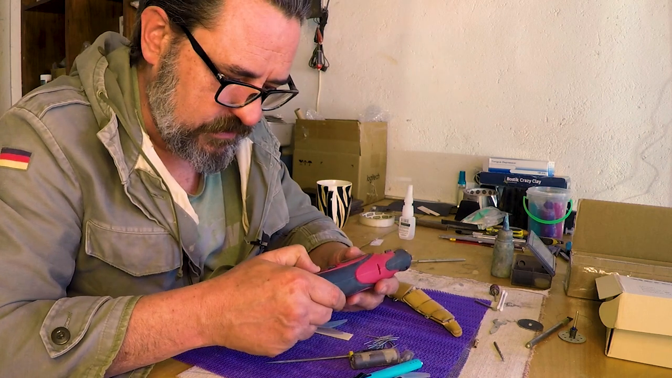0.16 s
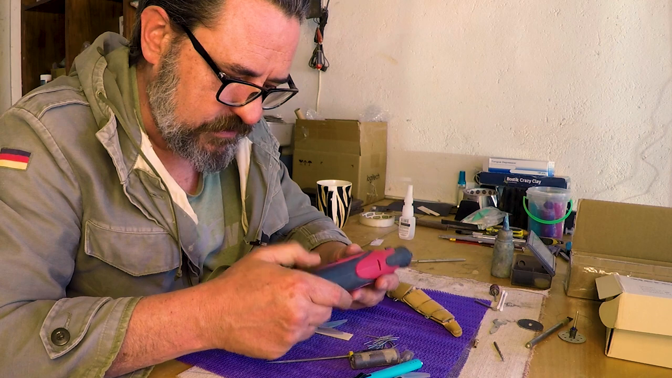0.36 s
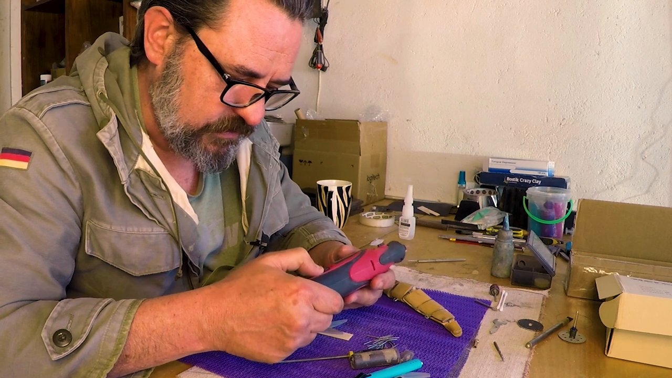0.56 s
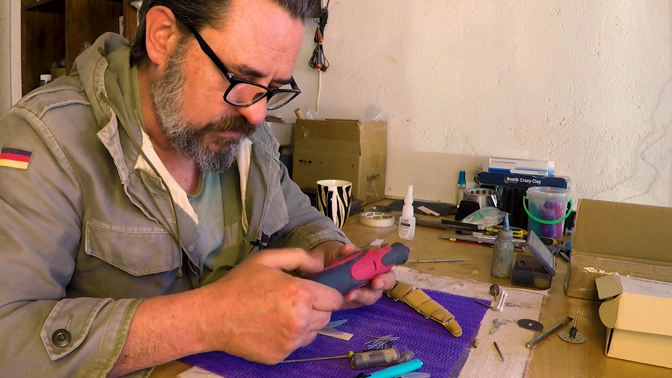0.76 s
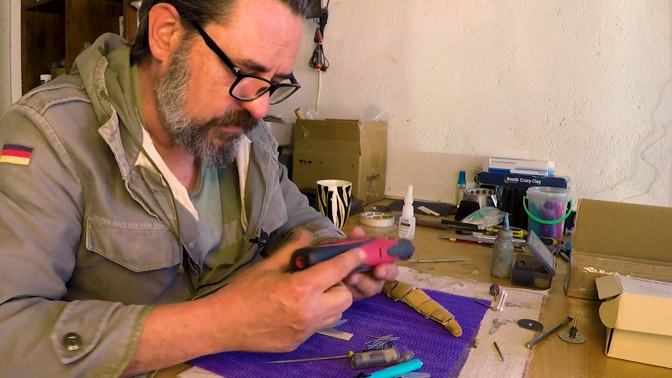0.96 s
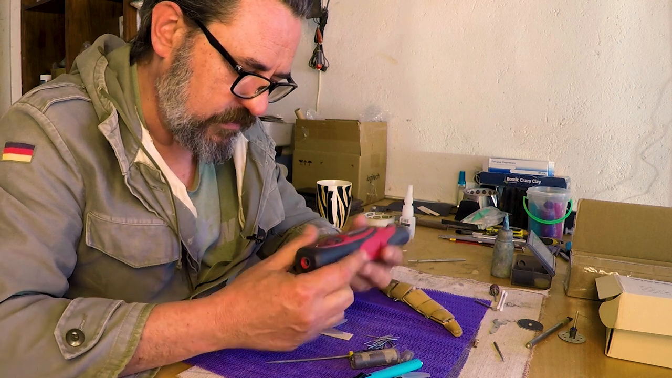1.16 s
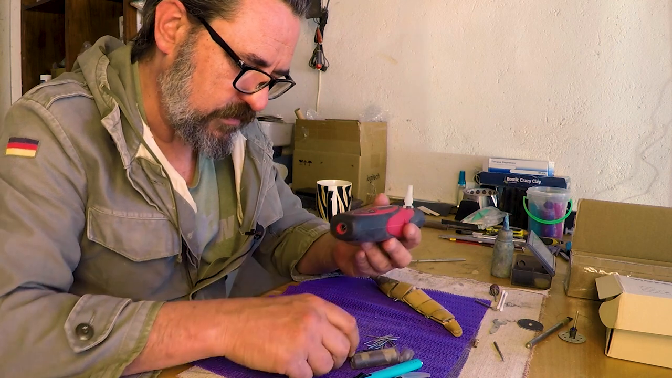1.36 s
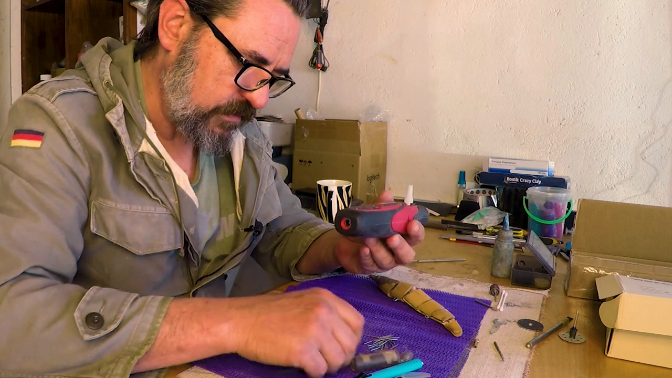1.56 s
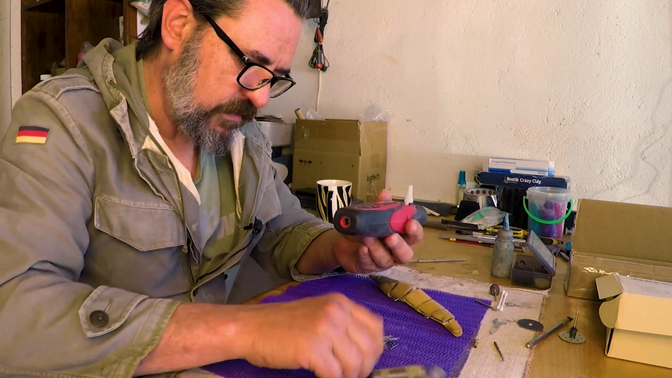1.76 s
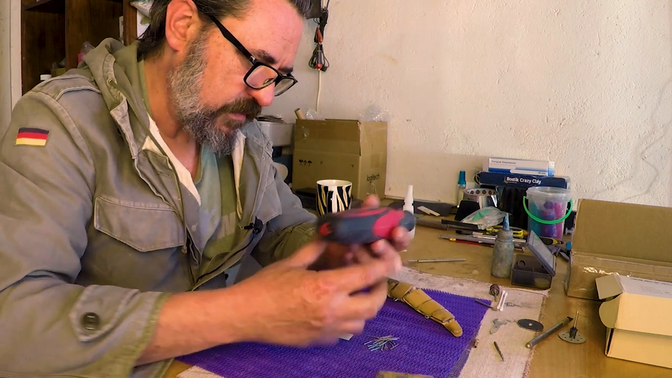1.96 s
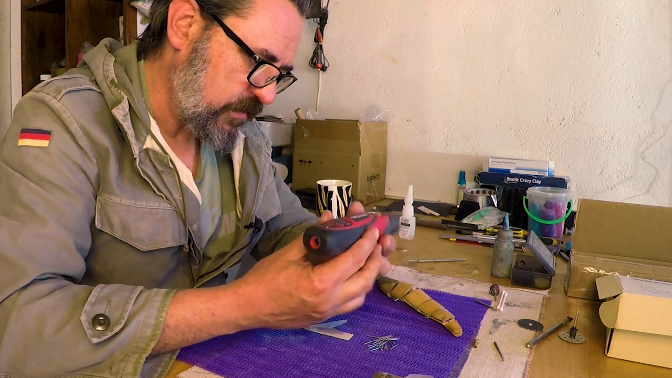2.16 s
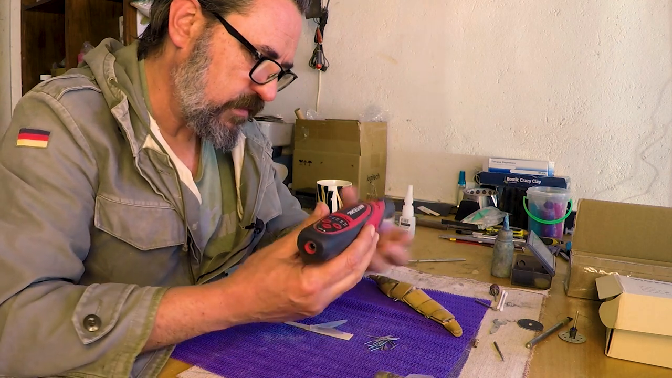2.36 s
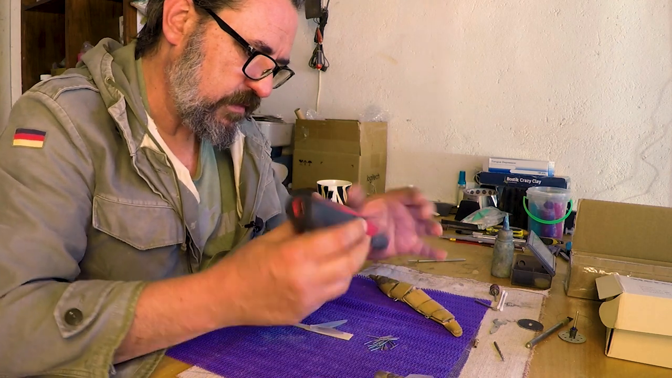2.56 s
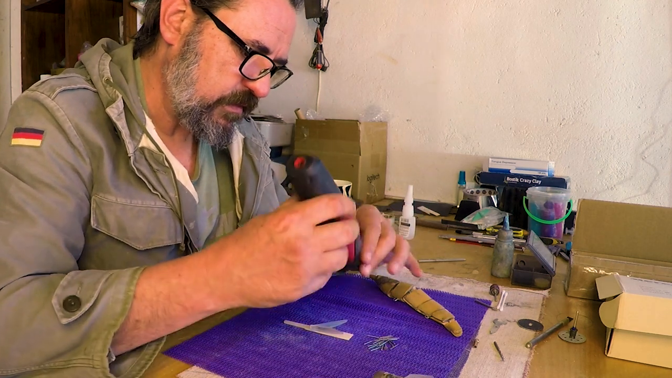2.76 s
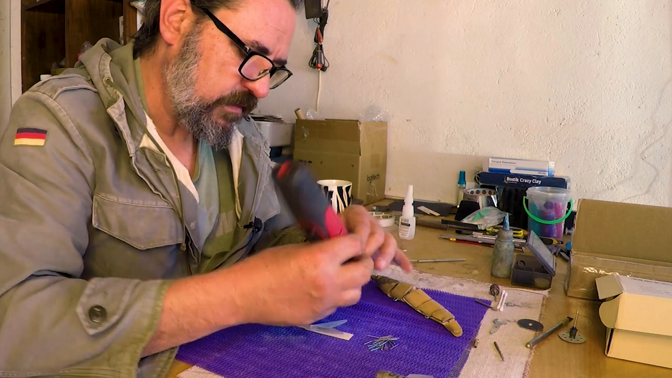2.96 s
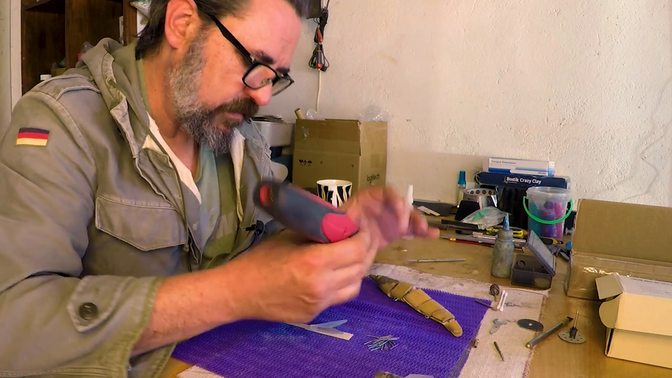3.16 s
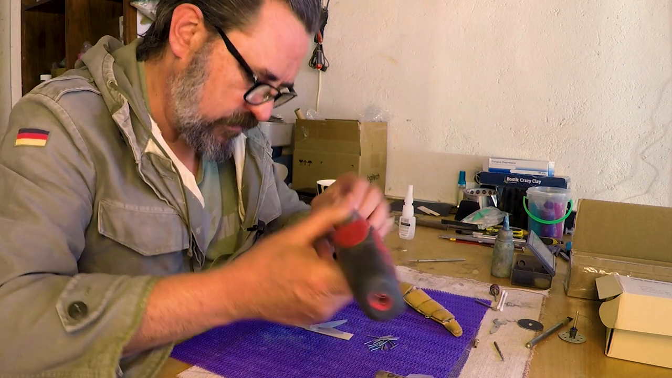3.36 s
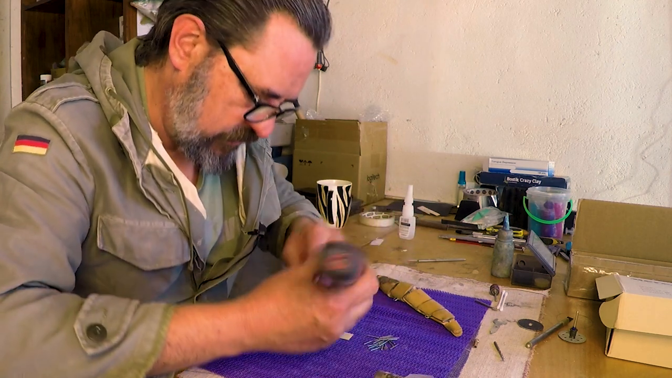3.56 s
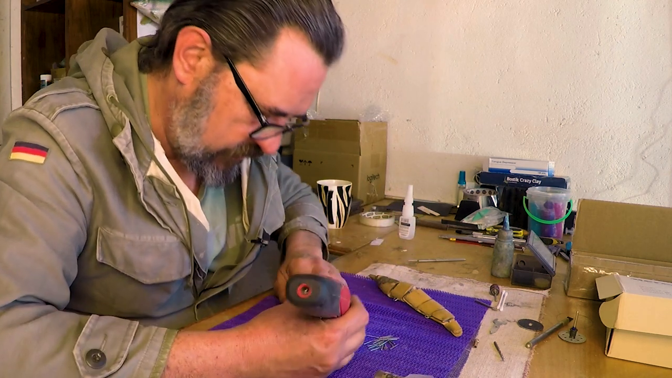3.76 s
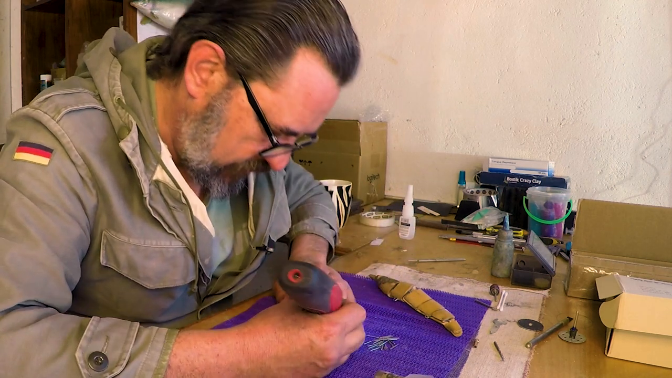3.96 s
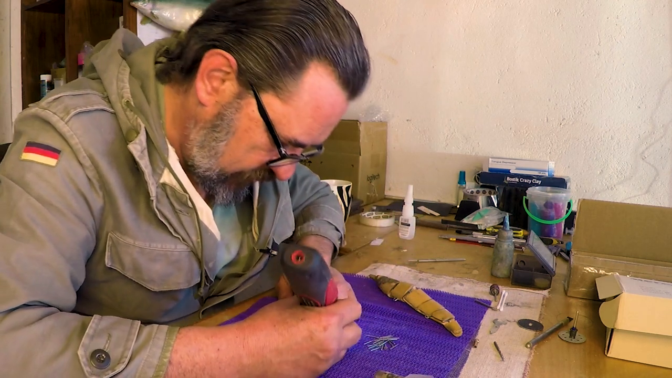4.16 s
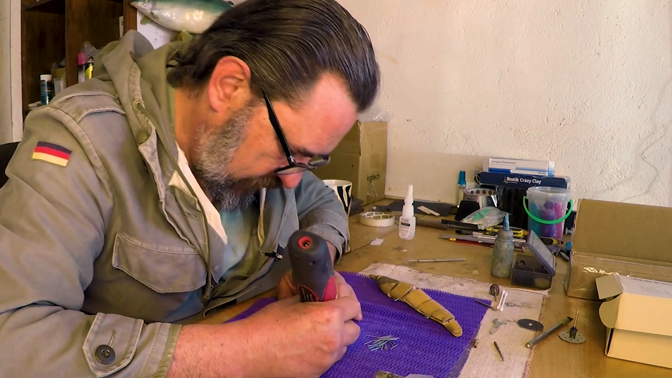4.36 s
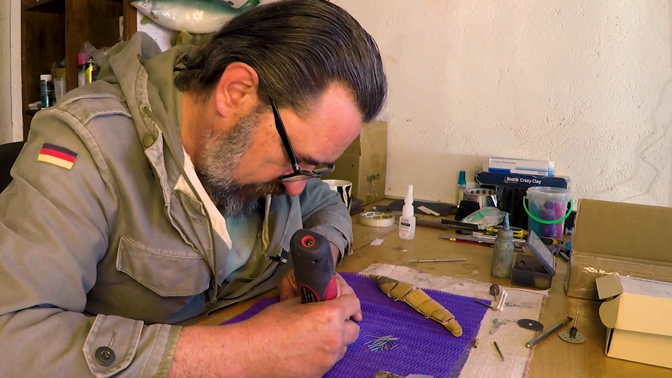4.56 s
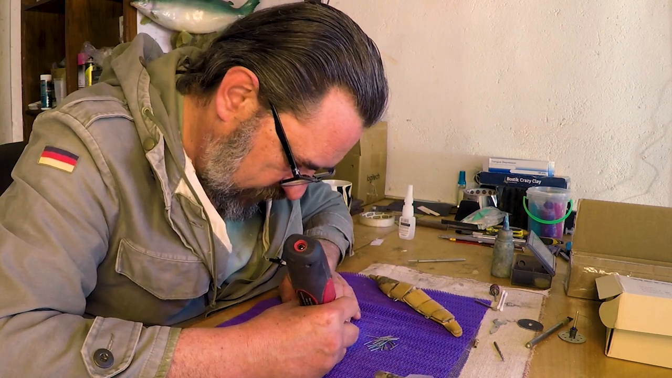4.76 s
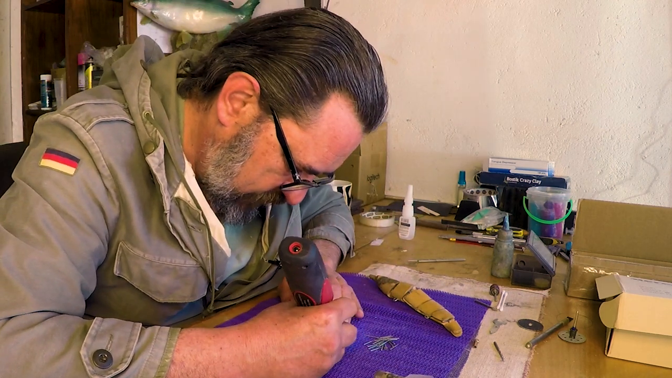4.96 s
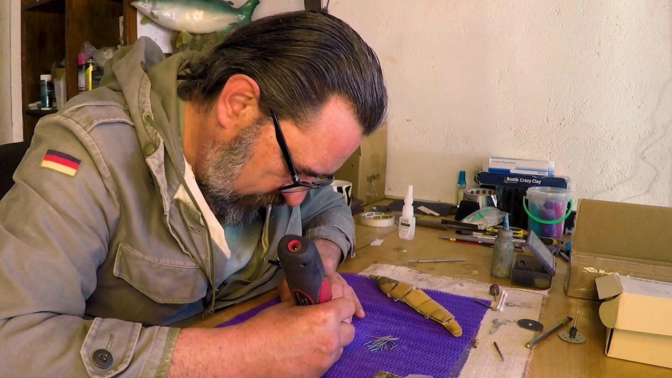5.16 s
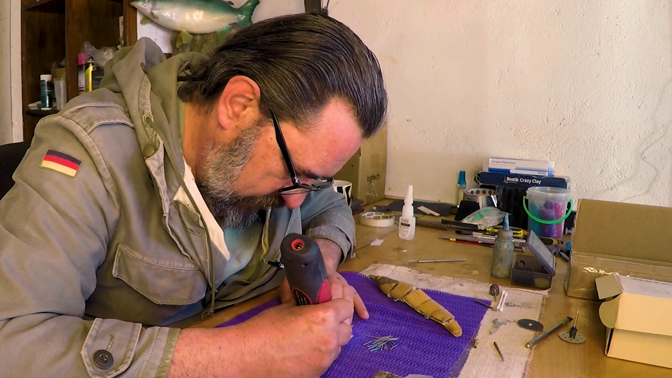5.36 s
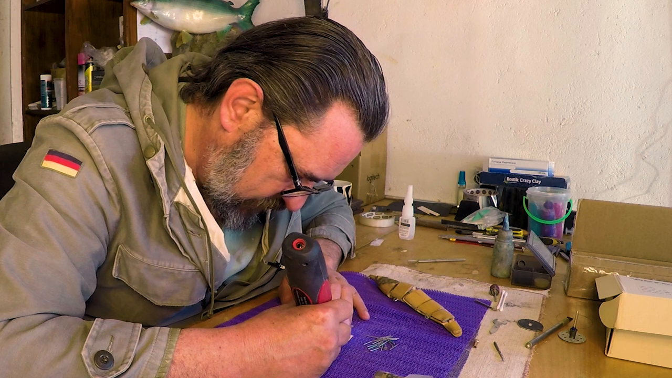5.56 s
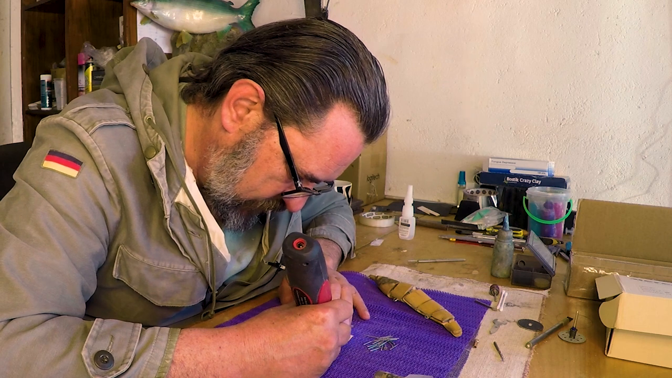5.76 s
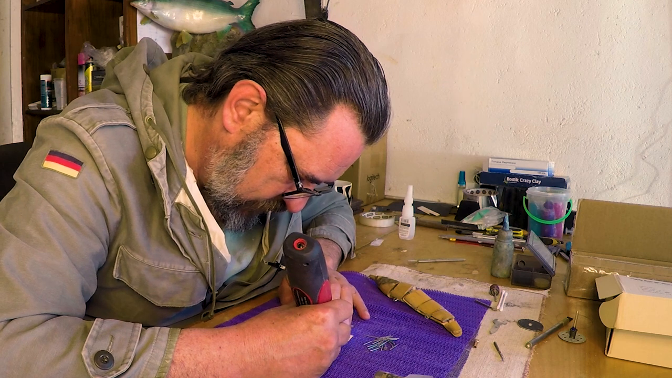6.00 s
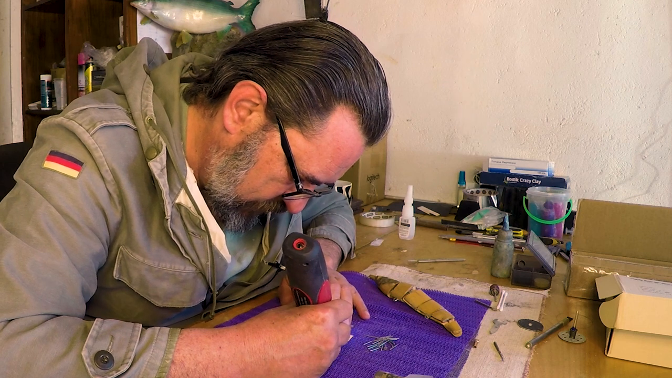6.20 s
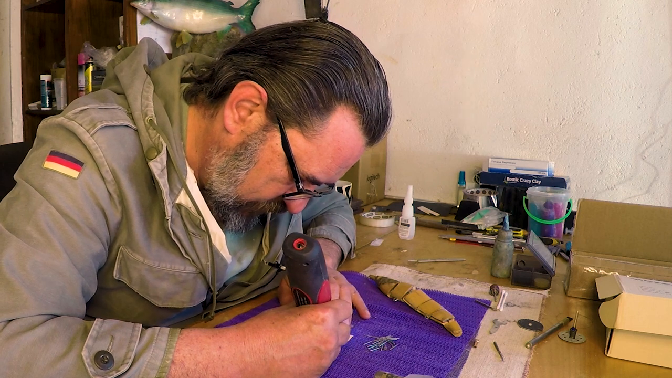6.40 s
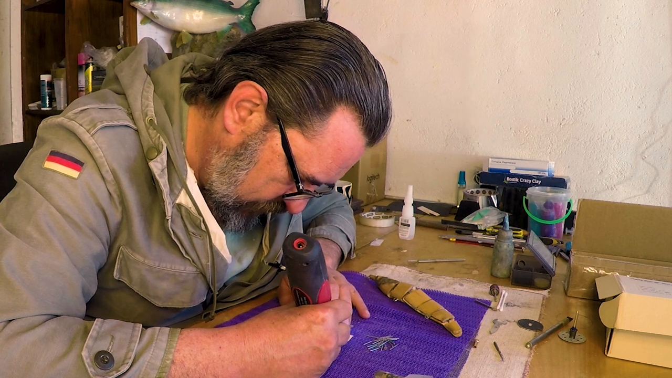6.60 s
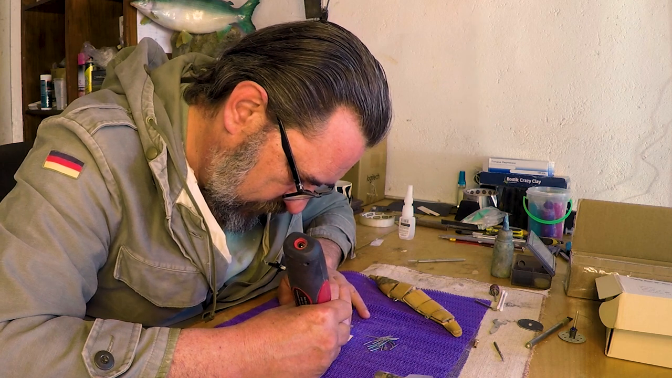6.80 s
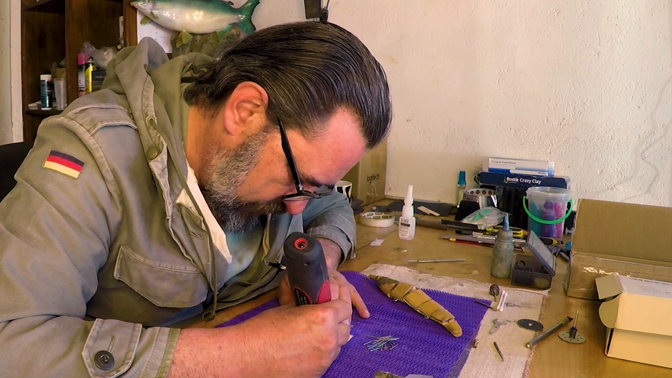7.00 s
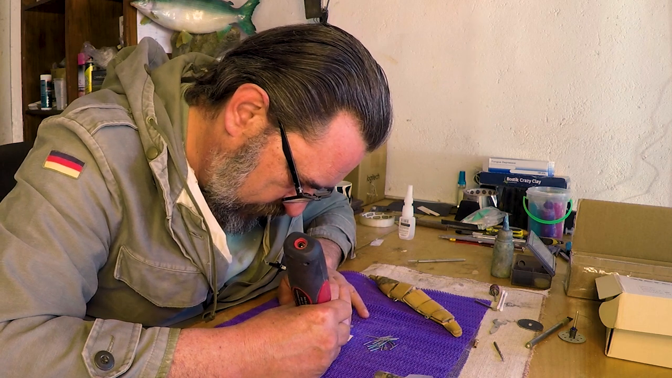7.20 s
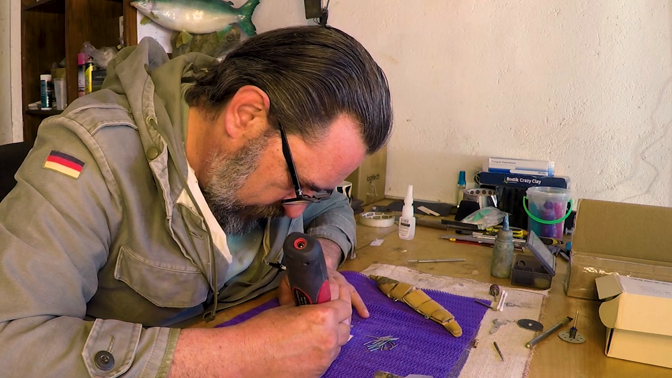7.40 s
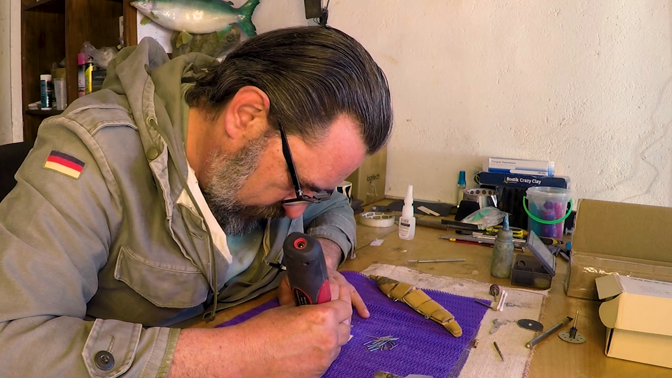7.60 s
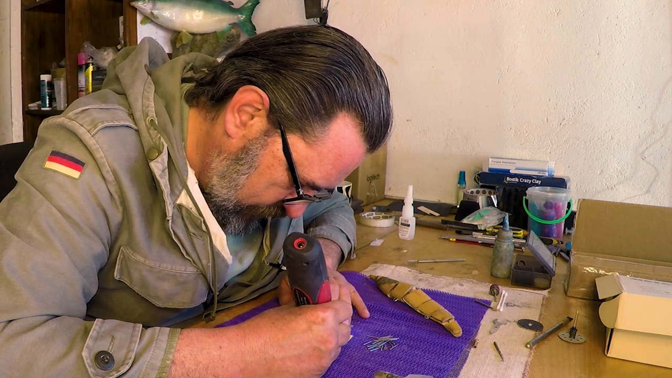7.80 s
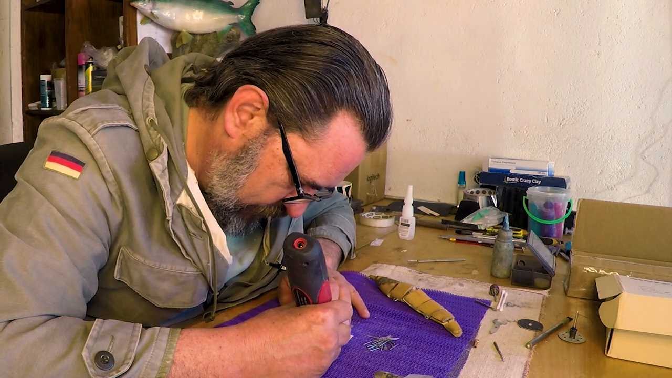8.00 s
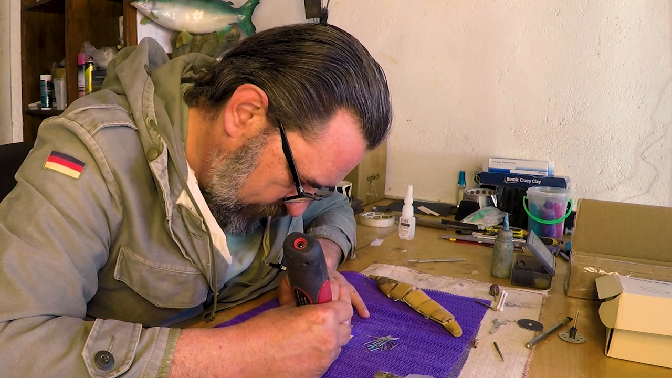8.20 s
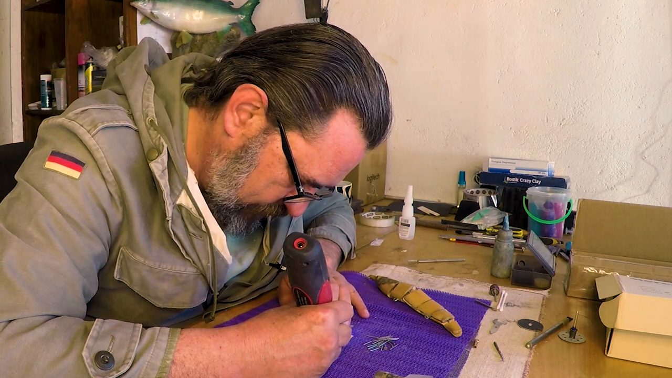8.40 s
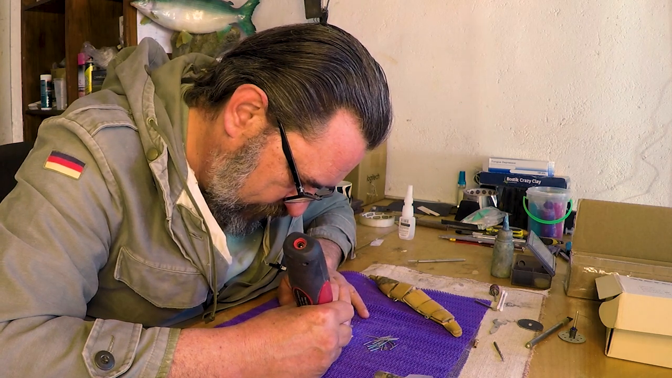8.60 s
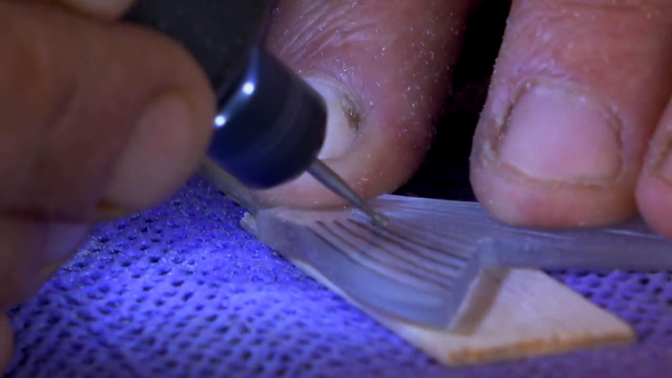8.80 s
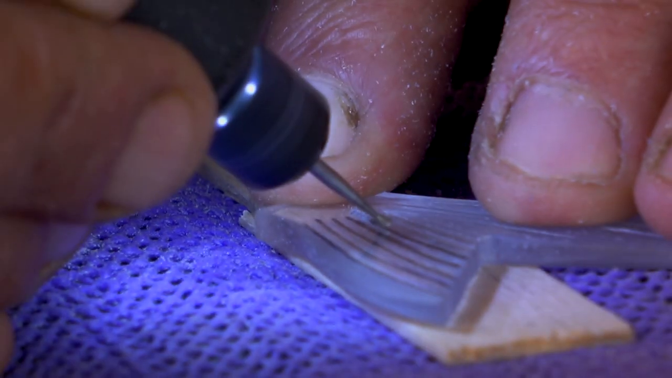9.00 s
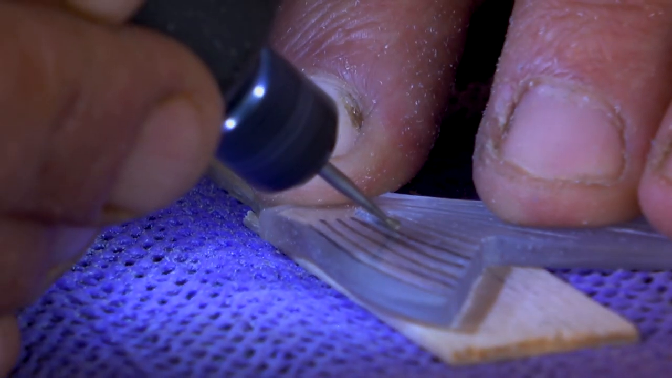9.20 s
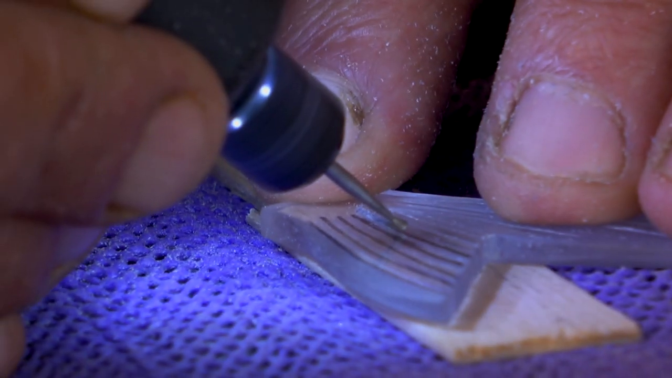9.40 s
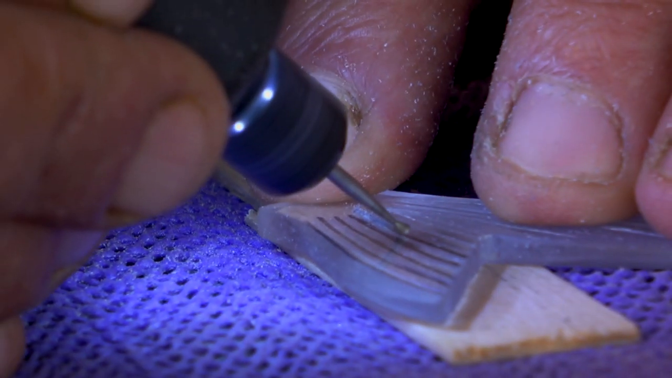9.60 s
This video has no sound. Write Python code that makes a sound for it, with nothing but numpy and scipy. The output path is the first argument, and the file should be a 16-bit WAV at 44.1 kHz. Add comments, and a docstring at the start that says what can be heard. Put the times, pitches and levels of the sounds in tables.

```python
"""Low workshop rumble and plastic clicks, then a small rotary tool starts softly and runs up to 280 turns a second.
It is turned in the hand, stood upright over a workpiece, and slows as its bit skips, bites and grinds.
Shaft orders whine from the casing, brushes buzz and spark over the commutator, cooling air rushes through
the vents and the speed controller whistles. One clip-on microphone hears it all, and clothing bumps it."""
import sys
import numpy as np
from scipy import signal
from scipy.fft import rfft, irfft, next_fast_len
from scipy.io import wavfile
from scipy.ndimage import uniform_filter1d, map_coordinates

SR = 44100
rng = np.random.default_rng(int(sys.argv[2]) if len(sys.argv) > 2 else 0)


def dump(signal):
    """Clip the signal to [-1, 1] and save it as 16-bit WAV at the path in sys.argv[1]."""
    limited = np.clip(np.atleast_2d(signal).T, -1, 1)
    pcm = np.round(limited * 32767).astype(np.int16)
    wavfile.write(sys.argv[1], SR, pcm)


N = 425565
TIME = np.arange(N) / SR  # s

SWITCH_ON, START_S = 0.229, 0.11  # s; time constant in s of the motor's noise building up
FULL_POWER = 0.7  # s, end of the soft start
FREE_SPEED = 280.3  # turns per s, approached without load
CONTACT, PRESS_S = 7.39, 0.24  # the bit meets the work (s), the hand leans on it (time constant, s)
BITE, BITE_S = 7.7, 0.28  # the bit sinks fully into the cut (start and length, s)
LOWER, LOWER_S = 3.59, 0.27  # the tool comes down close to the bench (start and length, s)
REST, REST_S = 4.86, 0.9  # the hand comes to rest on the work (start and length, s)

# Stages before the microphone: full power with the tool side on, then turned, tilted and upright in the hand.
# Each row: start of the change in seconds, its length in seconds, then base levels in dB of whine,
# fan air, brushes and whistle.
HOLDS = [(0.68, 0.07, -36.5, -48, -47.5, -42.5), (2.05, 0.4, -40.5, -43.5, -51, -42.5),
         (3.1, 0.23, -40.5, -41.5, -52, -43), (3.9, 0.49, -38, -41, -52.5, -45)]


def amp(db):
    """Turn dB into an amplitude factor."""
    return np.exp(np.asarray(db) * np.log(10) / 20)


def unit(x):
    """Bring a signal to rms 1."""
    return x / np.sqrt(np.mean(x ** 2) + 1e-20)


def curves(rows):
    """One value per sample for each column after the time."""
    seconds, *columns = np.transpose(rows)
    return [np.interp(TIME, seconds, column) for column in columns]


def ramp(start, length):
    """A straight rise from 0 to 1."""
    return np.clip((TIME - start) / length, 0, 1)


def settle(start, time_constant):
    """An exponential approach from 0 to 1."""
    return 1 - np.exp(-np.maximum(TIME - start, 0) / time_constant)


def bells(rows):
    """Bell-shaped swells from (s, half width at 1/e in s, height, ..) rows: one curve for each height."""
    seconds, width, *heights = np.transpose(rows)
    return np.array(heights) @ np.exp(-((TIME - seconds[:, None]) / width[:, None]) ** 2)


def wobble(rate):
    """A smooth random curve, rate knots a second."""
    knots = rng.standard_normal(int(N * rate / SR) + 4)
    grid = np.arange(0, len(knots) - 1, 1 / 8)
    return np.interp(TIME * rate, grid, map_coordinates(knots, [grid]))


def filtered(x, response):
    """Shape the spectrum of x by a response of frequency."""
    m = next_fast_len(N + SR // 2)
    return irfft(rfft(x, m) * response(np.fft.rfftfreq(m, 1 / SR)), m)[:N]


def coloured(x, points):
    """Shape x by a (Hz, dB) spectrum and bring it to rms 1."""
    f, db = np.transpose(points)
    return unit(filtered(x, lambda hz: amp(np.interp(np.log(hz + 1), np.log(f), db))))


def pulsed(angle, depth):
    """Noise that swells once in each cycle of the angle."""
    return rng.standard_normal(N) * np.exp(depth * np.cos(angle))


def one_turn(angle, size=4096):
    """A random surface profile that repeats with every turn of the shaft."""
    orders = np.arange(size // 2 + 1)
    heard = (orders > 12) & (orders < 57)
    profile = irfft(heard * np.exp(2j * np.pi * rng.random(len(orders))))
    return unit(profile)[(angle * size / (2 * np.pi)).astype(int) % size]


def stages():
    """How far the rise to full power and each later move of the hand have come, 0 to 1."""
    return np.array([ramp(start, length) for start, length, *_ in HOLDS])


def held():
    """Base levels of whine, fan air, brushes and whistle (dB), gliding from hold to hold."""
    levels = np.array(HOLDS)[:, 2:]
    return levels[0][:, None] + np.diff(levels, axis=0).T @ stages()[1:]


def shadow():
    """Losses (dB) of the whole tool, its whistle and its middle range as the hand passes in front."""
    # Each row: centre in seconds, half width at 1/e in seconds, then base losses in dB of the whole tool,
    # the whistle and the casing's middle range (extra; below zero it gains).
    hand_passes = [(2.58, 0.13, 2.5, 3, -2.5), (3.43, 0.24, 4, 12, 11), (4.46, 0.13, 0.4, 8, 0.5)]
    return bells(hand_passes)


def sway(braced_db=0.8, air_db=0.7, turn_db=1.2, cut_db=0.7):
    """Base depth (dB) of the swelling and fading with hand movement, deepest while turned in the air."""
    _, turned, _, upright = stages()
    depth_db = braced_db + air_db * (1 - upright) + turn_db * (turned - upright)
    return depth_db + cut_db * settle(CONTACT, PRESS_S)


def handled(x, patchy=1.08):
    """Hands and bench shade and reflect the tool: broad bands swell and fade."""
    hz, t, z = signal.stft(x, SR, nperseg=512)
    field = rng.standard_normal(z.shape)
    for _ in range(2):
        field = uniform_filter1d(field, size=8, axis=0)
        field = uniform_filter1d(field, size=28, axis=1)
    # short waves are shaded most
    depth_db = patchy * np.interp(t, TIME, sway()) * np.sqrt(hz / 6000)[:, None]
    return signal.istft(z * amp(depth_db * unit(field)), nperseg=512)[1][:N]


def spin_up(speed, doubling_db, start_db):
    """A sound builds after switching on and grows with each doubling of the speed (dB)."""
    return doubling_db * np.log2(speed / FREE_SPEED) - start_db * (1 - settle(SWITCH_ON, START_S))


def strain(speed, full_lag=0.09):
    """How hard the motor pulls while it runs up, 0 to 1, from how far its speed lags."""
    return stages()[0] * (TIME < CONTACT) * np.tanh((1 - speed / FREE_SPEED) / full_lag)


def casing_level(speed, touch_db=2, bite_db=-3.5):
    """Level of the casing's vibration (dB): the first touch raises it, the full cut damps it."""
    cut_db = touch_db * settle(CONTACT, 0.073) + bite_db * ramp(BITE, BITE_S)
    return held()[0] - shadow()[0] + spin_up(speed, doubling_db=6.5, start_db=19) + cut_db


def shaft(flutter=0.0036, flutter_rate=60, drift=0.062):
    """The shaft creeps, runs up at full power and sags in the cut; friction makes its angle flutter (rad)."""
    # The cut drags the shaft down. Each row: time in seconds, shaft speed in turns per second.
    cut_speed = [(7.42, 280.7), (7.52, 279.5), (8.01, 263.9), (8.09, 262.7), (9.36, 254.6), (9.58, 256.0)]
    # soft start: a jump to a first speed, then a creep towards a second
    kick_speed, creep_speed, creep_s = 101, 162.7, 0.27  # turns per s, turns per s, time constant s
    creep = kick_speed + (creep_speed - kick_speed) * settle(SWITCH_ON, creep_s)
    creep = np.minimum(creep, np.interp(FULL_POWER, TIME, creep))
    # full power: a quick leap, then a slow approach to the free speed
    leap_speed, leap_s, run_up_s = 48.5, 0.021, 0.219  # turns per s, time constants s
    climb = FREE_SPEED - leap_speed - creep[-1]
    speed = creep + leap_speed * settle(FULL_POWER, leap_s) + climb * settle(FULL_POWER, run_up_s)
    speed = np.where(TIME < CONTACT, speed, curves(cut_speed)[0])
    angle = 2 * np.pi * np.cumsum(speed) / SR
    return speed, angle + flutter * wobble(flutter_rate) + drift * wobble(8)


def room(floor_db=-56, drone_hz=67, drone_db=-60):
    """Low workshop rumble as filtered noise; a faint wavering drone joins it later."""
    # Each row: frequency in Hz, relative level in dB per Hz.
    rumble = [(15, -12), (45, 3.5), (90, -13.5), (330, -18.5), (420, -10), (700, -22.5), (1200, -25.5),
              (15000, -45)]
    drone = unit(np.sin(2 * np.pi * drone_hz * TIME + .5 * wobble(2.8)))
    drone = ramp(5.3, 1) * drone
    return amp(floor_db) * coloured(rng.standard_normal(N), rumble) + amp(drone_db) * drone


def bumps(t60=0.073, rise=0.0029, rub_db=-6, push_hz=100, push_t60=0.019):
    """Clothing knocks the microphone: a low push, a decaying sine, and a dull noisy rub (times in s)."""
    # Each row: start in seconds, base level in dB.
    knocks = [(3.161, -26.5), (3.177, -29), (3.196, -32), (3.263, -34), (3.29, -31), (4.887, -23.5),
              (4.973, -24.5), (5.061, -24.5), (5.199, -21)]
    # Cloth on the microphone. Each row: frequency in Hz, relative level in dB per Hz.
    cloth = [(25, -24), (70, -2), (150, 0.5), (300, -1.5), (480, -3.5), (700, -32), (2000, -45)]
    envelope, push, t = np.zeros(N), np.zeros(N), np.arange(SR // 4) / SR
    for start, db in knocks:
        onset = amp(db) * (1 - np.exp(-t / rise))
        envelope[round(start * SR):][:len(t)] += onset * amp(rub_db - 60 * t / t60)
        thump = amp(-60 * t / push_t60) * np.sin(2 * np.pi * push_hz * t)
        push[round(start * SR):][:len(t)] += 2 * onset * thump
    return push + envelope * coloured(rng.standard_normal(N), cloth)


def clicks(t60=0.017, crack=0.57, ring=0.24):
    """Plastic clicks of switch and casing: a short noise crack with a dead ring (t60 in s)."""
    # Each row: start in seconds, base level in dB, pitch of the ring in Hz.
    plastic = [(.033, -42.5, 3520), (.129, -51, 3000), (.231, -42, 6800), (0.2353, -26.5, 2670),
               (1.455, -20, 9400), (1.622, -20, 8760), (1.631, -19.5, 1518), (1.724, -13, 4150),
               (2.068, -27, 2534)]
    out, t = np.zeros(N), np.arange(SR // 10) / SR
    for start, db, hz in plastic:
        blow = crack * rng.standard_normal(len(t)) + ring * np.sin(2 * np.pi * hz * t)
        out[round(start * SR):][:len(t)] += amp(db - 60 * t / t60) * blow
    # gentle slopes below 1 kHz and above 10 kHz
    return filtered(out, lambda hz: 1j * hz / (1000 + 1j * hz) / (1 + 1j * hz / 10000))


def controller(speed, angle, chop_hz=7800.5, ripple_db=-10, rest_db=-6, cut_db=3.0):
    """The speed controller chops the current at a fixed rate; the three-pole rotor adds sidebands."""
    # The motor can radiates the sidebands. Each row: frequency in Hz, relative level in dB.
    motor_can = [(5900, -4), (6900, 7), (7500, -14), (8200, -18), (9000, -7)]
    tone = unit(np.sin(2 * np.pi * chop_hz * TIME + .1 * wobble(38)))
    ripple = tone * (np.cos(angle) + np.cos(3 * angle) + np.cos(6 * angle))
    db = held()[3] - shadow()[1] + spin_up(speed, doubling_db=4.5, start_db=-2)
    db += rest_db * ramp(REST, REST_S) + cut_db * settle(CONTACT, PRESS_S)
    db += 0.32 * sway() * wobble(4)
    return amp(db) * (tone + amp(ripple_db) * coloured(ripple, motor_can))


def hum(speed, angle, hum_db=-51.5, creep_db=-26, turned_db=-1.5, tilted_db=-3.5, shaded=.4):
    """Imbalance shakes the tool once a turn, hardly at all while it creeps."""
    running, turned, tilted, _ = stages()
    db = hum_db + creep_db * (1 - running) + turned_db * turned + tilted_db * tilted
    db -= shaded * shadow()[0]
    return amp(db + 0.85 * wobble(12)) * speed / FREE_SPEED * unit(np.cos(angle))


def fan(speed, angle, vent_hz=900, vent_width_hz=260, vent_db=-50, bench_db=5, depth=0.31,
        air_strain_db=7, vent_strain_db=5, cut_db=2):
    """Cooling air rushes through the casing and sounds a broad vent resonance, louder near the bench."""
    # Each row: frequency in Hz, relative level in dB per Hz.
    air_colour = [(120, -19), (380, -6.5), (640, -15.5), (1200, -6), (1700, 0), (2500, -9.5), (3400, -4.5),
                  (4200, 2.5), (5600, -2), (7000, -4.5), (8200, -25), (9400, -9.5), (11000, -9.5),
                  (15500, -54)]
    pull = strain(speed)
    air_db = held()[1] + spin_up(speed, doubling_db=2, start_db=15.5) - shadow()[0]
    air_db += air_strain_db * pull + cut_db * settle(CONTACT, 0.065)
    air = amp(air_db + 0.71 * wobble(17)) * coloured(pulsed(angle, depth), air_colour)

    def mode(f):
        """One resonance of the vents as a band-pass response."""
        return 1j * f * vent_width_hz / (vent_hz ** 2 - f * f + 1j * f * vent_width_hz)

    vent = unit(filtered(rng.standard_normal(N), lambda f: mode(f) ** 2))
    draught_db = spin_up(speed, doubling_db=8, start_db=-3) - shadow()[0] + vent_strain_db * pull
    return air + amp(vent_db + draught_db + bench_db * ramp(LOWER, LOWER_S)) * vent


def commutator(angle, steady_s=0.22):
    """Two high tones, the 18th and 24th shaft orders, change near the bench and at rest; the cut damps them."""
    # Each row: shaft order, base level in dB in the air, then changes in dB near the bench,
    # with the hand at rest and in the cut.
    tones = [(18, -56, 9.5, 1.5, -14), (24, -53.5, -2.5, 11.5, -14)]
    lowered, resting = ramp(LOWER, LOWER_S), ramp(REST - steady_s, steady_s)
    bitten = ramp(BITE, BITE_S)
    out = np.zeros(N)
    for order, air_db, bench_db, rest_db, cut_db in tones:
        db = air_db + bench_db * lowered + rest_db * resting + cut_db * bitten
        out += amp(db + sway() * wobble(6)) * np.cos(round(order) * angle)
    return np.sqrt(2) * out


def brushes(speed, angle, buzz_db=6, hiss_db=-1.0, tones_db=-1, depth=0.12, cut_db=3.0, shaded=0.99,
            rub=0.0092):
    """Brushes buzz with the surface of the commutator and spark over it as hiss, more under load."""
    # Buzz. Each row: frequency in Hz, relative level in dB.
    buzz_colour = [(3000, -9), (4500, -4), (6000, -7), (7300, -4), (9500, -4), (10700, -10), (11700, 2),
                   (12800, 4), (14000, -2), (15700, -5)]
    # Sparking. Each row: frequency in Hz, relative level in dB per Hz.
    spark_colour = [(1000, -11), (5000, -39), (6000, -16), (7000, 5.5), (9300, 5.5), (10600, -15),
                    (12400, 7.5), (14000, -5), (15700, -6.5)]
    # The brushes spark harder for a moment. Each row: centre in seconds, half width at 1/e in seconds,
    # rise in dB.
    flares = [(2.15, 0.14, 1.5), (2.88, 0.074, 1.5), (5.55, 0.41, 3)]
    brush_db = held()[2] + bells(flares)[0] - shaded * shadow()[0]
    brush_db += spin_up(speed, doubling_db=3, start_db=4) + cut_db * settle(CONTACT, PRESS_S)
    running = (speed / speed.max()) ** 1.3
    rubbed = angle + rub * wobble(70)  # rad
    # three more profiles come and go as the hand moves
    passing = sum(wobble(3.7) * one_turn(rubbed) for _ in range(3))
    buzz = one_turn(rubbed) + (amp(sway()) - 1) * passing
    buzz = amp(buzz_db) * running * coloured(buzz, buzz_colour)
    sparks = amp(hiss_db + 4.5 * (1.5 - running)) * coloured(pulsed(angle, depth), spark_colour)
    tones = amp(tones_db - shadow()[0]) * running ** 2 * commutator(angle)
    return amp(brush_db) * (buzz + sparks) + tones


def rasp(speed, angle, rasp_db=-5, slow_db=8, depth=0.53, upright_db=-9, hollowed=0.3):
    """The shaft rattles in its bearings: more below full speed, less once the tool stands upright."""
    # Each row: frequency in Hz, relative level in dB per Hz.
    rattle = [(500, -14.5), (1100, -15), (1600, -2.5), (2200, -4), (2900, -2), (3700, -4), (6000, -17)]
    db = casing_level(speed) + rasp_db + upright_db * stages()[-1]
    db += slow_db * (1 - speed / speed.max()) - hollowed * shadow()[2]
    return amp(db) * coloured(pulsed(angle, depth), rattle)


def skid(angle, skid_db=-39, fade_s=0.26, depth=0.91, catch_db=3):
    """At first touch the bit skips over the surface in uneven bursts, until it has cut a groove."""
    # Each row: frequency in Hz, relative level in dB per Hz.
    skip_colour = [(1200, -29.5), (2200, -3), (3200, -6), (4200, 0), (5600, 0), (7000, -9), (10000, -16)]
    envelope = ramp(CONTACT, 0.087) * (1 - settle(CONTACT, fade_s))
    bursts = amp(skid_db + catch_db * wobble(23)) * envelope
    return bursts * coloured(pulsed(angle, depth), skip_colour)


def grinding(angle, depth=0.73, chatter_db=2, catch_db=0.8, chips_db=-39, light_chips_db=-4,
             thrum_db=-31.0, light_thrum_db=-20, brighten=0.037, groove_s=1.8):
    """The bit scrapes unevenly once a turn and sets the workpiece thrumming; both grow with pressure."""
    # Each row: frequency in Hz midway into the groove, relative level in dB per Hz.
    chip_colour = np.array([(1500, -62), (3500, -9), (5500, -1), (6600, -2.5), (9500, -2), (11300, 7.5),
                            (12150, -3.5), (12700, 1), (14000, -58), (15700, -41)])
    contact, light = ramp(CONTACT, 0.055), 1 - settle(CONTACT, PRESS_S)
    bites = pulsed(angle, depth) * amp(chatter_db * wobble(280) + catch_db * wobble(30))
    # the scrape rises in pitch as the groove deepens
    shallow = coloured(bites, chip_colour * [1 - brighten, 1])
    deep = coloured(bites, chip_colour * [1 + brighten, 1])
    chips = handled(shallow + (deep - shallow) * ramp(CONTACT, groove_s))
    thrum = amp(thrum_db + light_thrum_db * light + 0.63 * wobble(16)) * unit(np.sin(angle))
    return contact * (amp(chips_db + light_chips_db * light) * chips + thrum)


def partial(order, angle, sway_db):
    """One shaft order, swelling and fading as the hand moves; short waves sway more."""
    swell = amp(sway_db * min(order / 9, 1.2) * wobble(3.05))
    return swell * np.cos(order * angle + rng.uniform(0, 2 * np.pi))


def whine(speed, angle, beat=.15, casing_hz=1335, casing_width_hz=70, casing_db=11, build_s=0.37,
          creep_db=-4, skip_db=2.0, upright_play_db=-1, chatter_db=1.66, touch_s=0.11,
          hollow_hz=1780, hollow_width_hz=480):
    """Shaft orders from the second up ring from the casing; the bearing puts sidebands above some."""
    # The casing radiates differently to each side, and differently again under load: creeping, side on,
    # turned, tilted, upright, touching, loaded. Each row: shaft order, relative level in dB.
    tables = ([(1, -19), (2, -21), (3, -10.5), (4, -18), (5, -13), (6, -17), (7, -8), (8, -4), (9, -2.5),
               (10, -6), (11, -18), (12, 0.5), (13, -10)], [(1, -12), (2, -22.5), (3, -7), (4, -20), (5, -6), (6, -14), (7, 0),
                                 (8, -5.5), (9, 3), (10, -3.5), (11, -1), (12, -7)], [(1, -5), (2, -10), (3, -1), (4, -2), (5, -8), (6, 0.5),
                                                  (7, -2.5), (8, -3), (9, 1), (10, 2), (11, -0.5), (12, 2)], [(1, -11), (2, -16.5), (3, -3.5),
                                                                  (4, -4.5), (5, -12), (6, -3), (7, 1),
                                                                  (8, 1), (9, -3), (10, -1), (11, -22),
                                                                  (12, -11)], [(1, -12), (2, -12.5),
                                                                                  (3, -4), (4, -7), (5, -3),
                                                                                  (6, 2.5), (7, -1.5),
                                                                                  (8, -5), (9, -8),
                                                                                  (10, -3.5), (11, -3),
                                                                                  (12, -3.5)],
              [(1, 0), (2, -3), (3, -5), (4, -7.5), (5, -6.5), (6, -8), (7, 2), (8, -5.5), (9, -8),
               (10, -11), (11, -8), (12, -2.5), (13, -16), (14, -6.5), (15, -8), (16, -9), (17, -22),
               (18, -4.5), (19, -16), (20, -6), (21, -20)], [(1, 0), (2, -11), (3, -12.5), (4, -3.5), (5, -9), (6, -12), (7, -12),
                                 (8, -14), (9, -15), (10, -20), (11, -14.5), (12, -11), (13, -10.5),
                                 (14, -17.5), (15, -14), (16, -9.5), (17, -14), (18, -19), (19, -16),
                                 (20, -17), (21, -9.5), (22, -19)])
    # Each row: multiple of the bearing beat, base level in dB against the order.
    bearing = [(1, -8.5), (2, -9.5), (3, -16)]
    # Resonances of the workpiece. Each row: centre in Hz, half width in Hz, rise in dB under load.
    work_modes = [(1295, 8.6, 7), (1802, 19, 10)]
    running, upright = stages()[0], stages()[-1]
    creep, load, sway_db = 1 - running, ramp(CONTACT, touch_s), sway()
    # full power, each move, the touch and the bite lead on to the next pattern of orders
    grip = stages().sum(axis=0) + load + ramp(BITE, BITE_S)
    top_order = len(tables[-1])
    patterns = np.zeros((len(tables), top_order))
    for row, table in zip(patterns, tables):
        row[:len(table)] = amp(np.transpose(table)[1])
        row /= np.linalg.norm(row[4:12])  # equal strength over orders 5 to 12
    # the top of the whine opens only close to full speed
    shortfall = np.clip(1 - speed / speed.max(), 0, .12) * (1 - load) * running
    # the bearing rattles only at speed, and side pressure takes up some of its play
    play = running * (1 - 0.26 * load) * amp(upright_play_db * upright)
    out, hollow_db = np.zeros(N), shadow()[2]
    for order in range(2, top_order + 1):
        tone = partial(order, angle, sway_db)
        if 7 <= order <= 12:
            for k, side_db in bearing:
                phase = rng.uniform(0, 2 * np.pi)
                tone += play * amp(side_db) * np.cos((order + round(k) * beat) * angle + phase)
        db = -30 * np.clip(order - 6, 0, 4) * shortfall
        # the bit makes each order flutter, most while it still skips over the surface
        db += (chatter_db + skip_db * (1 - ramp(BITE, BITE_S))) * load * wobble(22)
        # gliding orders pass through resonances of the casing and of the workpiece
        hz = order * speed
        casing = settle(SWITCH_ON, build_s) / (1 + ((hz - casing_hz) / casing_width_hz) ** 2)
        db += creep * (creep_db + casing_db * casing)
        for mode_hz, width_hz, mode_db in work_modes:
            db += load * mode_db / (1 + ((hz - mode_hz) / width_hz) ** 2)
        # the passing hand changes the middle range
        db -= hollow_db * np.exp(-((order * FREE_SPEED - hollow_hz) / hollow_width_hz) ** 2)
        level = np.interp(grip, np.arange(len(tables)), patterns[:, order - 1])
        out += level * amp(db) * tone
    return np.sqrt(2) * amp(casing_level(speed)) * out


def scene():
    """All sources meet at one microphone, alike in both channels."""
    speed, angle = shaft()
    rush = handled(rasp(speed, angle) + brushes(speed, angle) + fan(speed, angle))
    tool = whine(speed, angle) + hum(speed, angle) + controller(speed, angle) + rush
    tool = ramp(SWITCH_ON, 0.0023) * tool
    mono = room() + bumps() + clicks() + tool + skid(angle) + grinding(angle)
    return np.array([mono, mono])


def record(dry, top_hz=15750):
    """The recorder keeps nothing above its band limit."""
    return np.array([filtered(channel, lambda hz: hz < top_hz) for channel in dry])


dry = scene()
out = record(dry)
dump(out)
```